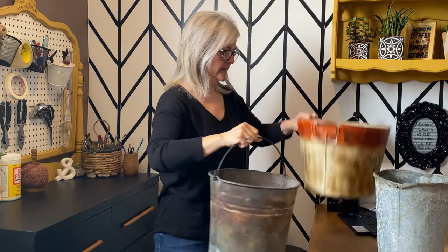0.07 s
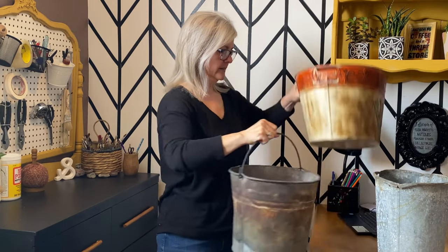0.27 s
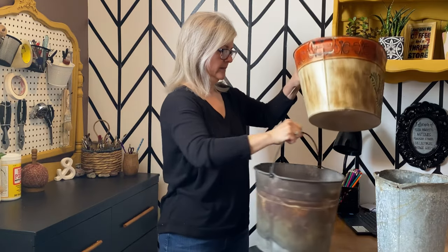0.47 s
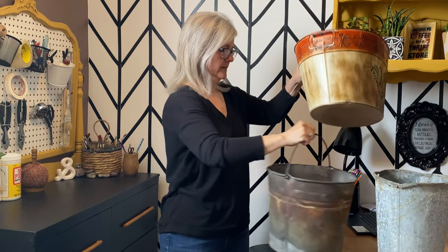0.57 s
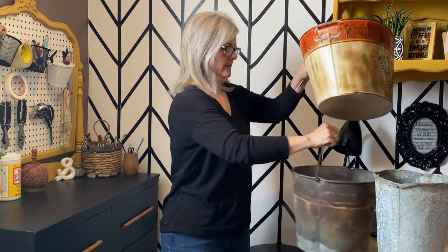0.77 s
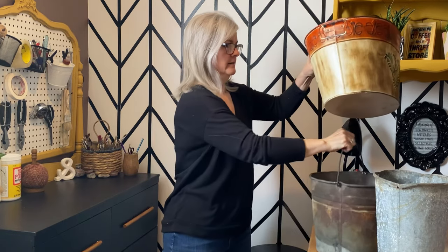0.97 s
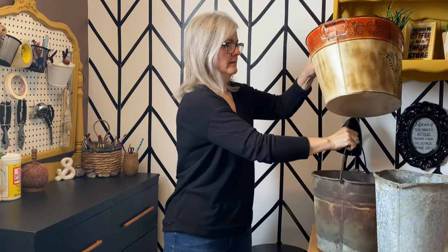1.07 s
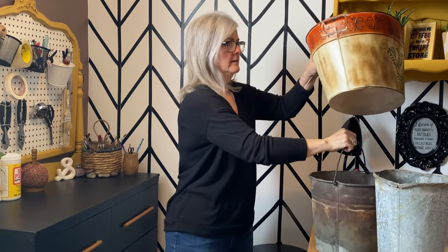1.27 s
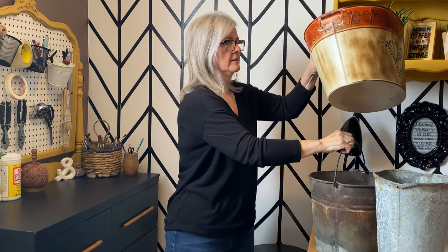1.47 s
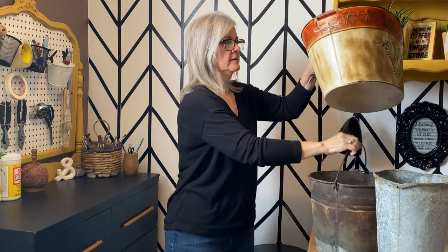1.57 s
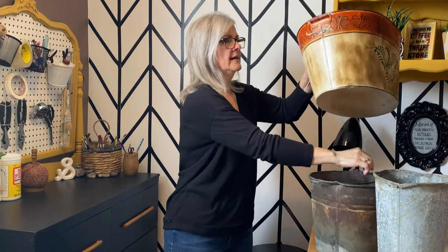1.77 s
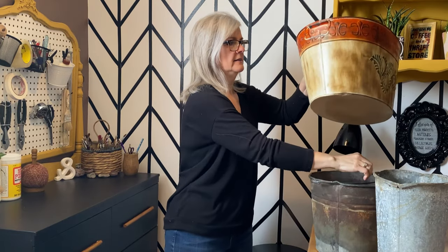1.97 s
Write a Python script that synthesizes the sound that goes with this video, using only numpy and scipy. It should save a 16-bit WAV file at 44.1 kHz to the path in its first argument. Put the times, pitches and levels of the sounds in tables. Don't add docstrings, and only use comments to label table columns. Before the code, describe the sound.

Old sheet-metal bucket thuds down on a wooden desk, then its wire handle scrapes and clanks

```python
import sys
import numpy as np
from scipy import signal
from scipy.io import wavfile

SR = 44100
rng = np.random.default_rng(int(sys.argv[2]) if len(sys.argv) > 2 else 0)


def gain_from_decibels(decibels):
    exponent = np.asarray(decibels, float) / 20
    return 10 ** exponent


def master(y):
    cut = np.clip(np.atleast_2d(y).T, -1, 1)
    pcm = np.round(cut * 32767)
    wavfile.write(sys.argv[1], SR, pcm.astype(np.int16))


N = 89522


def at_hz(points, hz):
    p = np.array(points)
    return np.interp(np.log(hz), np.log(p[:, 0]), p[:, 1])


def rms_one(x):
    return x / np.sqrt(np.mean(x ** 2) + 1e-20)


def unit(response):
    return response / np.sqrt(np.sum(response ** 2) / 2)


def through(x, response):
    return signal.fftconvolve(np.atleast_2d(x), response, axes=1)[:, :N]


def bands(spectrum, t60s, alike, size):
    out = 0
    t = np.arange(size) / SR
    edges_hz = 22 * 2 ** np.arange(0, 9.7, 1 / 3)
    white = rng.standard_normal((2, 2, size))
    alike = np.clip(alike, -.95, .95)
    for k, (low, high) in enumerate(zip(edges_hz, edges_hz[1:])):
        band = signal.butter(2, [low, high], "band", fs=SR, output="sos")
        mid, side = signal.sosfilt(band, white[k % 2])
        hz = np.sqrt(low * high)
        gain = gain_from_decibels(at_hz(spectrum, hz) - 60 * t / max(at_hz(t60s, hz), .02))
        out = out + gain * (np.sqrt(1 + alike) * mid + np.sqrt(1 - alike) * side * [[1], [-1]])
    return unit(out)


def rumble():
    # (frequency [Hz], level [dB])
    noise_spectrum = [(15, -40.5), (25, -16), (108, -10), (149, -32), (180, -14), (206, -2.5), (300, -15.5),
                      (335, -41), (16000, -62.5)]
    # (frequency [Hz], level [dB], width [Hz])
    hums = [(95, -50.5, 12), (166.7, -54, 24), (253, -76, 30), (318, -71, 12)]
    endless = [(100, 1e6), (200, 1e6)]
    out = gain_from_decibels(-47) * rms_one(bands(noise_spectrum, endless, alike=0.27, size=N))
    for hz, db, width_hz in hums:
        r = np.exp(-np.pi * width_hz / SR)
        resonator = [1, -2 * r * np.cos(2 * np.pi * hz / SR), r * r]
        hum = signal.lfilter([1], resonator, rng.standard_normal(N + SR))
        out += gain_from_decibels(db) * rms_one(hum[SR:])
    return out


def lift():
    # (frequency [Hz], level [dB])
    rasp_spectrum = [(200, -3), (700, -18.5), (3000, -29), (4300, -23.5), (5300, -17), (6500, -36),
                     (9000, -30), (16000, -68)]
    level_db, t60_s = -37, 0.49
    x = bands(rasp_spectrum, [(200, 2.98 * t60_s), (5000, t60_s)], alike=.3, size=SR)
    start_rms = np.sqrt(np.mean(x[:, :SR // 20] ** 2))
    return gain_from_decibels(level_db) * np.pad(x / start_rms, ((0, 0), (0, N - SR)))


def shake():
    level_db, low_hz, high_hz, start_s, rise_s = -45.5, 35, 110, 0.81, 0.033
    band = signal.butter(2, [low_hz, high_hz], "band", fs=SR, output="sos")
    mid, side = signal.sosfilt(band, rng.standard_normal((2, N)))
    tremble = rms_one(mid * [[1.2], [.8]] + 0.19 * side * [[1], [-1]])
    return gain_from_decibels(level_db) * tremble * np.clip((np.arange(N) / SR - start_s) / rise_s, 0, 1)


def ringing(modes):
    # (frequency [Hz], phase spread between ears [rad])
    phase_spread = [(100, 1.2), (300, 0.18), (600, 1.3), (3000, 3.3), (9000, 5.4)]
    # (frequency [Hz], left minus right [dB])
    left_lean = [(60, -1), (240, -3.5), (950, 1), (3770, 7), (12000, 22)]
    longest_cycles = 750
    hz, db, t60_s = np.transpose(modes)[:, :, None]
    t = np.arange(SR) / SR
    turn = rng.standard_normal(hz.shape) * at_hz(phase_spread, hz) / 2
    lean = gain_from_decibels(at_hz(left_lean, hz) / 2)
    fade = gain_from_decibels(db) * np.exp(-np.log(1000) * t / np.clip(t60_s, .02, longest_cycles / hz))
    sines = fade * np.sin(2 * np.pi * hz * t)
    cosines = fade * np.cos(2 * np.pi * hz * t)
    ears = []
    for gain, sign in ((lean, 1), (1 / lean, -1)):
        ear = (np.cos(turn) * gain).T @ sines + (sign * np.sin(turn) * gain).T @ cosines
        ears.append(ear[0])
    return unit(np.array(ears))


def sheet_metal(lines, lines_db, wall):
    # (frequency [Hz], t60 [s])
    wall_t60 = [(100, 1), (500, 0.24), (1500, 0.21), (4000, 0.22), (12000, 0.073)]
    count, wash_db = 190, 4
    draw = rng.random((count, 3))
    hz = 200 + 4500 * ((np.arange(count) + draw[:, 0]) / count) ** 1.5
    t60_s = at_hz(wall_t60, hz) * (.6 + .6 * draw[:, 1])
    db = at_hz(wall, hz) + 6 * draw[:, 2] - 10 * np.log10(t60_s / hz ** .33)
    crowd = ringing(np.c_[hz, db, t60_s])
    wash = bands(wall, wall_t60, alike=.3, size=SR)
    return crowd + gain_from_decibels(lines_db) * ringing(lines) + gain_from_decibels(wash_db) * wash


def contacts(rows, spread):
    chatter = 2.14
    out = np.zeros(N + SR)
    t = np.arange(SR // 4) / SR
    for s, db, hz, length_s in rows:
        u = t / max(length_s, .001)
        force = rng.standard_normal(len(t)) * u * np.exp(-u)
        force[int(length_s * SR)] += np.sqrt(np.sum(force ** 2)) / chatter
        top_hz = min(hz * spread, 20000)
        force = signal.lfilter(*signal.butter(1, [hz / spread, top_hz], "band", fs=SR), force)
        force = signal.lfilter(*signal.butter(1, top_hz, fs=SR), force)
        start = int(s * SR)
        out[start:start + len(t)] += gain_from_decibels(db) * force / np.sqrt(np.sum(force ** 2))
    return out[:N]


def rub():
    # (time [s], level [dB])
    slide = [
        (1.46, -47),
        (1.485, -31.5),
        (1.529, -55.5),
        (1.562, -36.5),
        (1.598, -15),
        (1.659, -12.5),
        (1.76, -19),
        (1.81, -38.5),
        (1.879, -49),
        (2.03, -54.5),
    ]
    ticks_per_s, spread_db = 3000, 3.5
    s, db = np.transpose(slide)
    ticks = (rng.random(N) < ticks_per_s / SR) * rng.choice([-1, 1], N)
    ticks = ticks * gain_from_decibels(spread_db * np.minimum(rng.exponential(1, N), 4))
    level_db = np.interp(np.arange(N) / SR, s, db, left=-140, right=-140) - 28.5
    return rms_one(ticks) * gain_from_decibels(level_db)


def desk_thuds(wire):
    # (time [s], level [dB], contact pitch [Hz], contact length [s])
    thuds = [(.906, -8.5, 283, 0.00597), (.95, -18.5, 279, 0.0059), (1.238, -18.5, 278, 0.0036),
             (1.268, -11.5, 270, 0.0044), (1.31, -24, 193, .01), (1.485, -25, 284, .015),
             (1.57, -25.5, 306, 0.007), (1.605, -16, 211, 0.0042), (1.69, -18, 303, 0.01084),
             (1.947, -20, 233, 0.0078), (1.98, -24.5, 213, 0.0073)]
    # (frequency [Hz], level [dB], t60 [s])
    desk_modes = [(95.6, -8, 0.62), (122.3, -11, 0.7), (193, -7, 0.055), (242, -6, 0.2),
                  (294.3, 3.5, 0.079), (372, -5.5, 0.2)]
    felt = gain_from_decibels(-7.5) * signal.lfilter(*signal.butter(2, 700, fs=SR), wire)
    return gain_from_decibels(16.5) * through(contacts(thuds, spread=1.4) + felt, ringing(desk_modes))


def handle_on_rim(wire):
    # (time [s], level [dB], contact pitch [Hz], contact length [s])
    clanks = [
        (.232, -48, 3100, .012),
        (.901, -37, 9000, 0.0076),
        (1.22, -53, 2590, 0.023),
        (1.27, -48, 2000, 0.029),
        (1.325, -44, 2500, .02),
        (1.468, -28.5, 2560, .01),
        (1.562, -20.5, 2590, 0.017),
        (1.616, -3.5, 2160, .004),
        (1.645, -25.5, 3050, 0.014),
        (1.738, -10.5, 2820, .006),
    ]
    # (frequency [Hz], level [dB], t60 [s])
    rim_modes = [(318, -3, .9), (590, 0, .3), (1020, -5, .4), (1200, -7, .4), (1413, -5, .3),
                 (1567, -6, .4), (1836, -5, .26), (2020, -8, .35), (2412, -8, .35), (2750, -5, .25),
                 (380, -5, .4), (4040, -13, .3), (820, -8, .3), (2273, -9, .3)]
    # (frequency [Hz], level [dB])
    rim_wall = [(100, -29), (300, -4.5), (600, 5), (1000, 5.5), (2500, -0.5), (7000, -9.5), (11000, -21),
                (16000, -21.5)]
    rim = sheet_metal(rim_modes, -3, rim_wall)
    return gain_from_decibels(25) * through(contacts(clanks, spread=8.1) + wire, rim)


def base_landings():
    # (time [s], level [dB], contact pitch [Hz], contact length [s])
    landings = [
        (.893, -23, 870, 0.0013),
        (.899, 0, 787, 0.004026),
        (.914, -7, 482, 0.00757),
        (.945, -19.5, 834, 0.00268),
        (1.015, -32, 820, 0.0027),
        (1.268, -24.5, 437, 0.00972),
        (1.31, -24, 648, 0.023),
        (1.52, -19, 778, .02),
        (1.616, -13, 630, 0.0042),
        (1.95, -23, 530, 0.008),
    ]
    # (frequency [Hz], level [dB], t60 [s])
    base_modes = [(236, -18, .7), (257, -14, 1.4), (292, -5, .4), (320, -8, .5), (386, -14, .7),
                  (441, -9, 1.5), (533, -6, 1.0), (588, -6, .4), (678, -6, .6), (775, -9, .7),
                  (840, -7, .18), (910, -8, .6), (1082, -8, .35), (480, -9, .25)]
    # (frequency [Hz], level [dB])
    base_wall = [(90, -28), (300, 5.5), (800, 8.5), (1200, 4), (2000, -4.5), (4000, -10.5), (8000, -1.5),
                 (16000, 8.5)]
    base = sheet_metal(base_modes, 0.5, base_wall)
    return gain_from_decibels(13) * through(contacts(landings, spread=2.43), base)


def bucket():
    radiates_hz = 161
    wire = rub()
    x = base_landings() + handle_on_rim(wire) + desk_thuds(wire)
    return signal.sosfilt(signal.butter(2, radiates_hz, "high", fs=SR, output="sos"), x)


def scene():
    # (frequency [Hz], t60 [s])
    room_t60 = [(100, 1), (1000, 0.66), (8000, 0.22)]
    near = bucket()
    room = bands([(100, 14), (8000, 22.5)], room_t60, alike=0.3, size=SR // 2)
    room = np.pad(room, ((0, 0), (SR // 150, 0)))
    return near + gain_from_decibels(-6) * through(near, room) + rumble() + lift() + shake()


def band_limit(x):
    return signal.sosfilt(signal.butter(12, 16100, fs=SR, output="sos"), x)


def record(dry):
    # (frequency [Hz], width [Hz], depth: negative adds [ratio])
    mid_dips = [(9050, 1000, 1.), (13200, 900, .95), (15000, 2000, -1.2)]
    cutoff_hz = 16700
    left, right = np.tanh(np.abs(dry) ** 2.596) ** 0.42 * np.sign(dry)
    mid, side = (left + right) / 2, (left - right) / 2
    for hz, width_hz, depth in mid_dips:
        for _ in range(2):
            mid = mid - depth * signal.lfilter(*signal.iirpeak(hz, hz / width_hz, fs=SR), mid)
    low_pass = signal.cheby2(12, 50, cutoff_hz, fs=SR, output="sos")
    mix = signal.sosfilt(low_pass, [mid + side, mid - side])
    return band_limit(np.clip(mix, -1, 1))


dry = scene()
out = record(dry)
master(out)
```